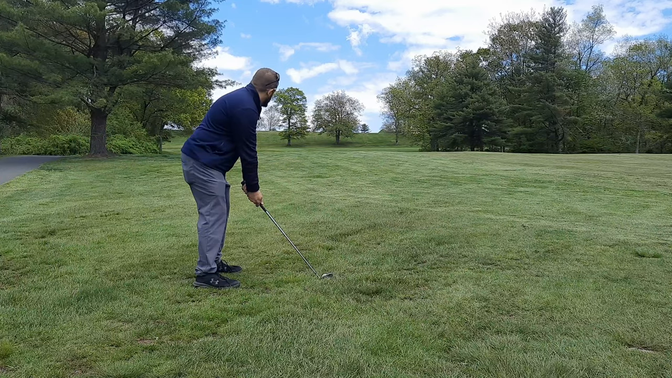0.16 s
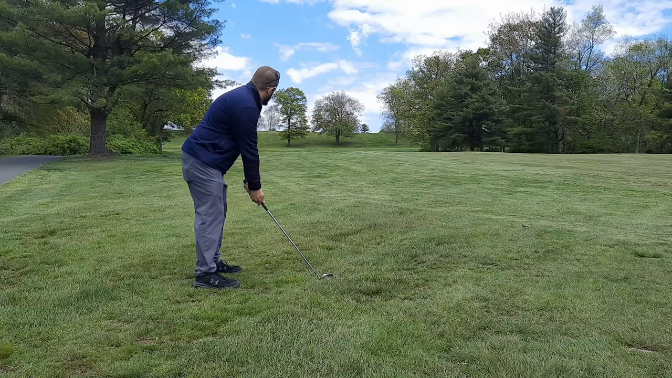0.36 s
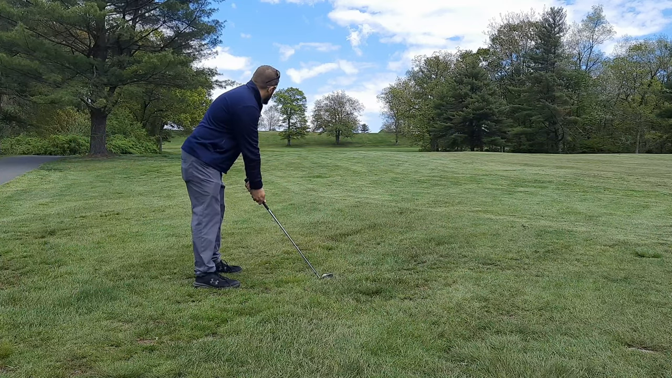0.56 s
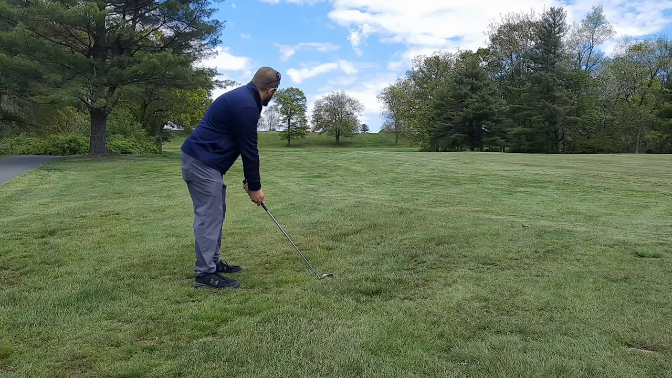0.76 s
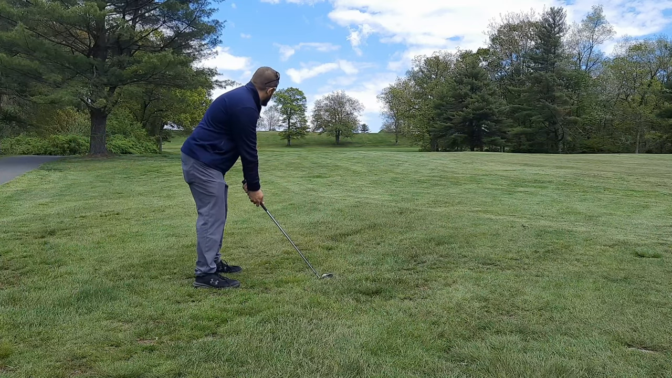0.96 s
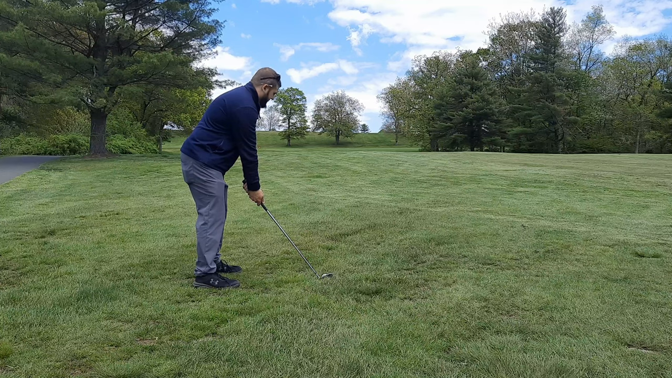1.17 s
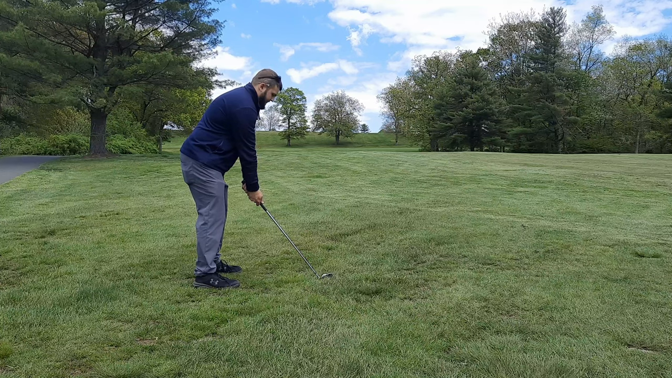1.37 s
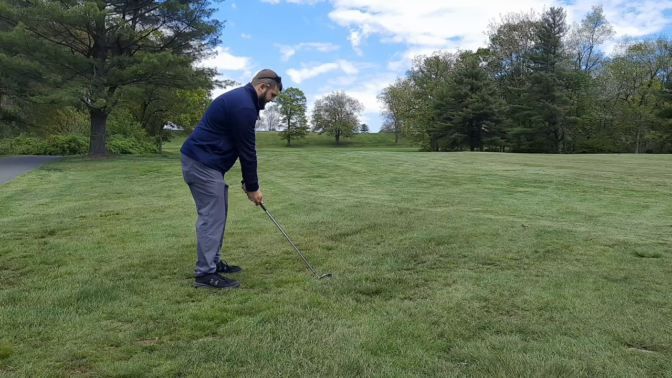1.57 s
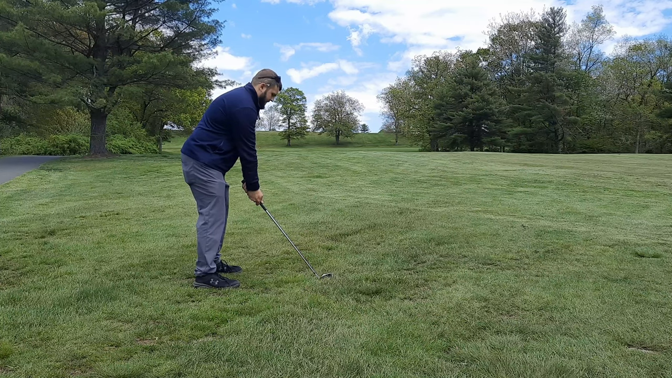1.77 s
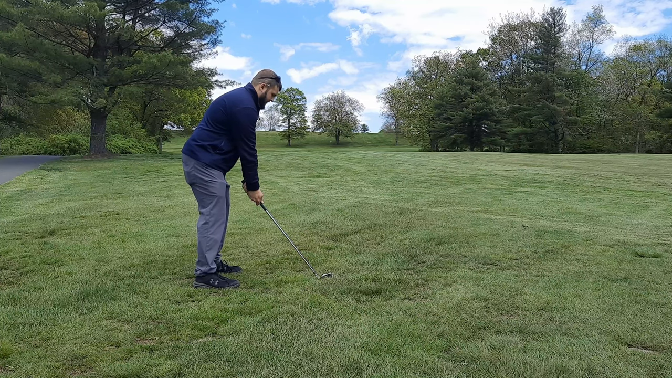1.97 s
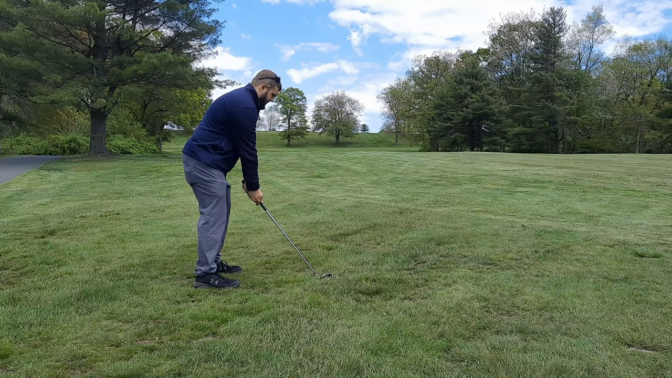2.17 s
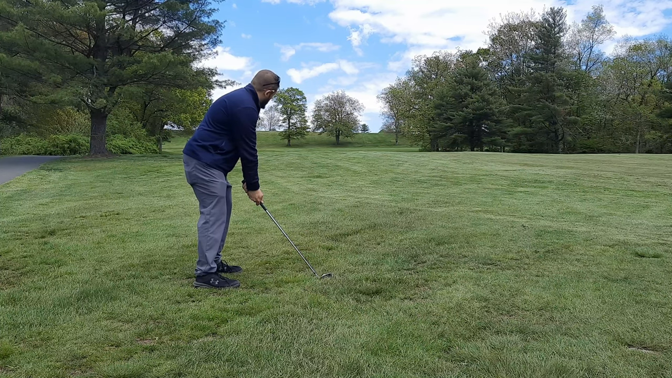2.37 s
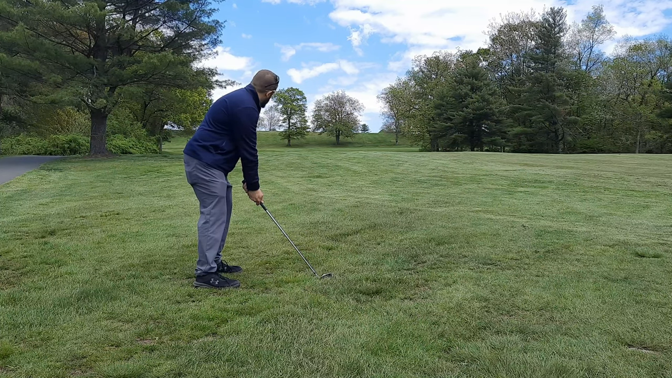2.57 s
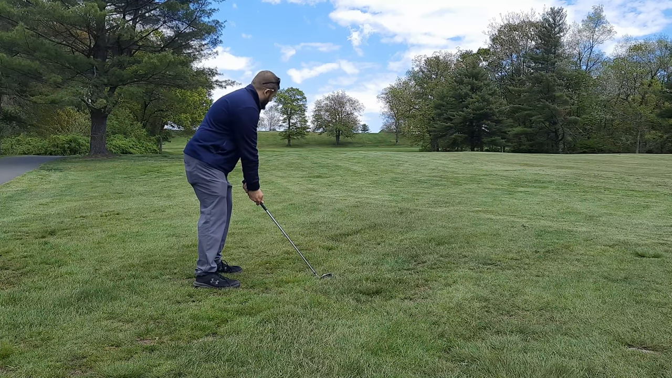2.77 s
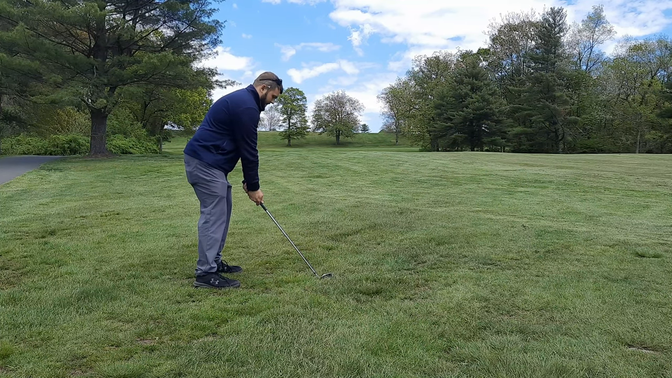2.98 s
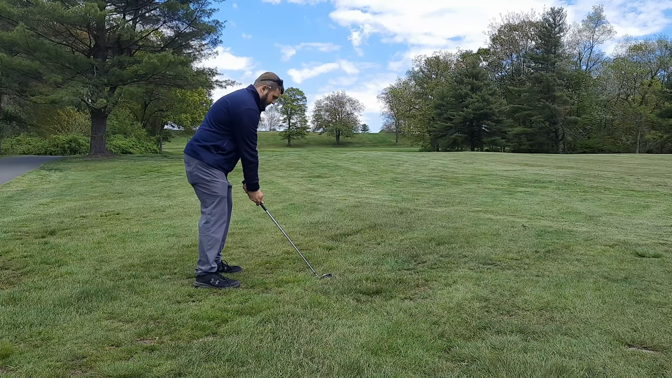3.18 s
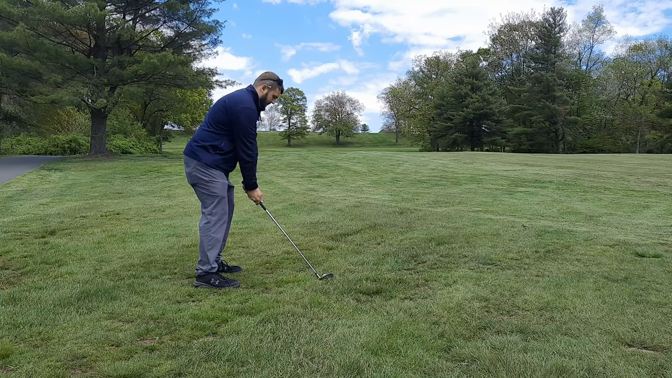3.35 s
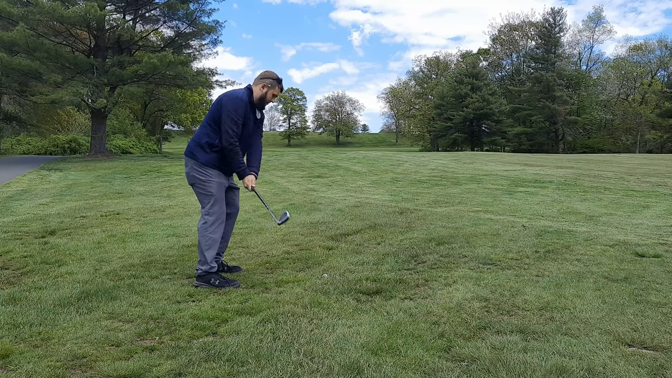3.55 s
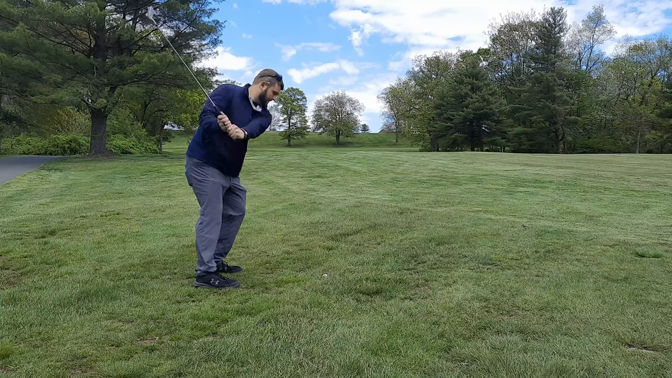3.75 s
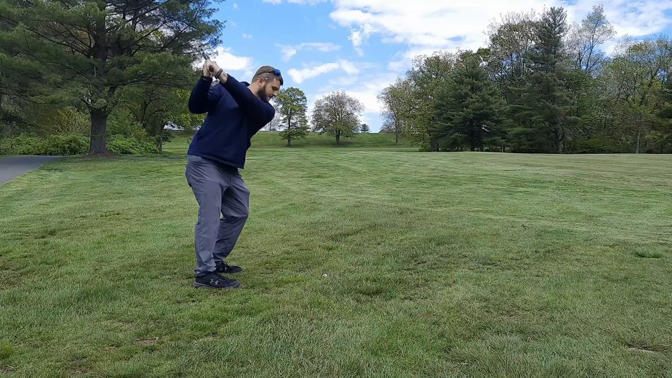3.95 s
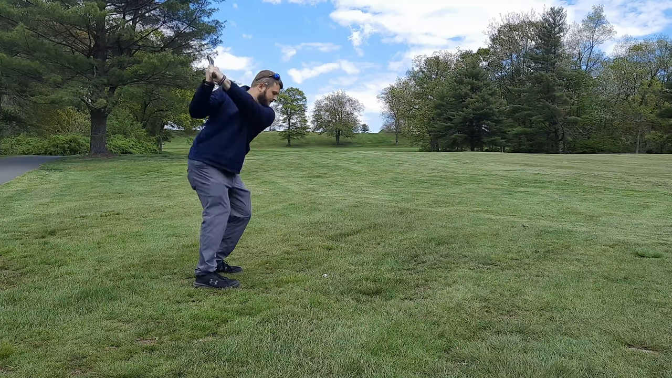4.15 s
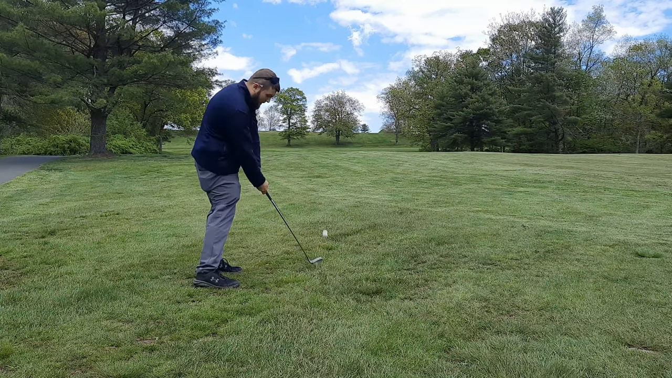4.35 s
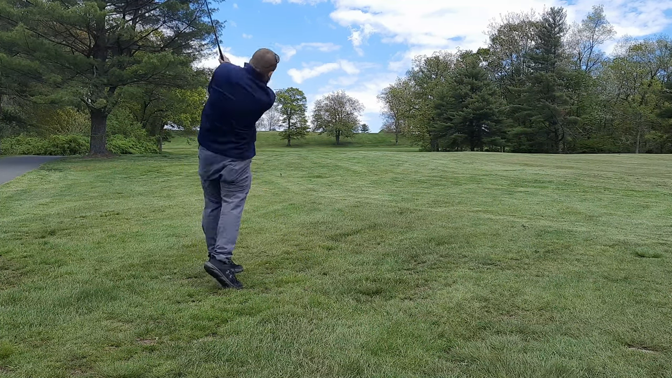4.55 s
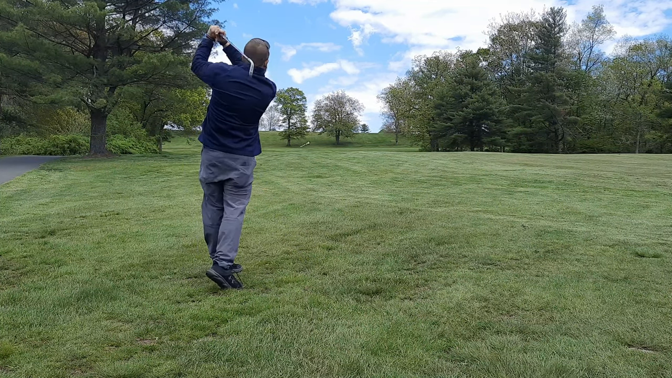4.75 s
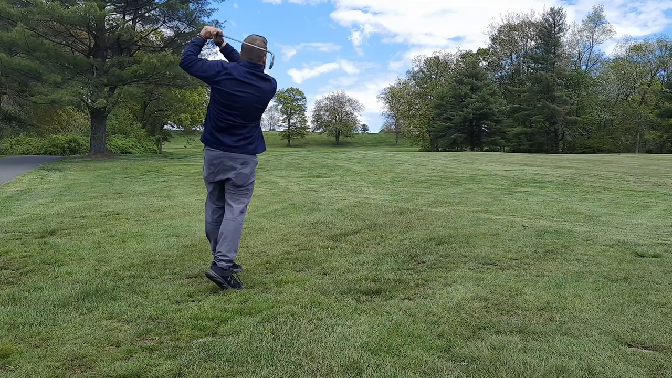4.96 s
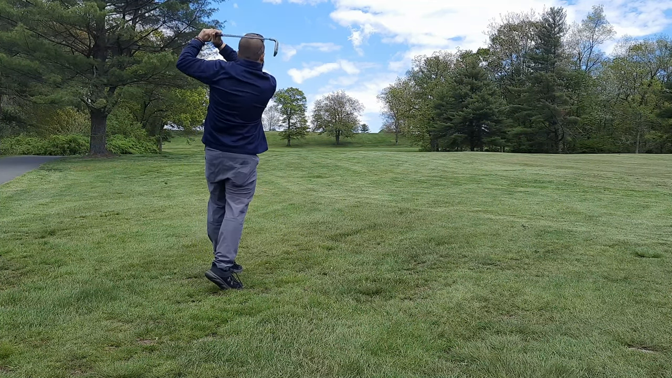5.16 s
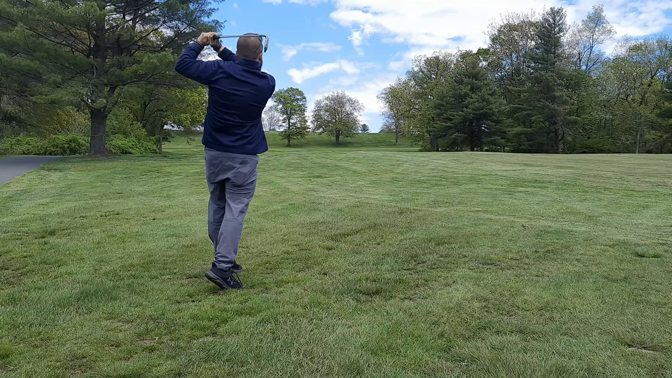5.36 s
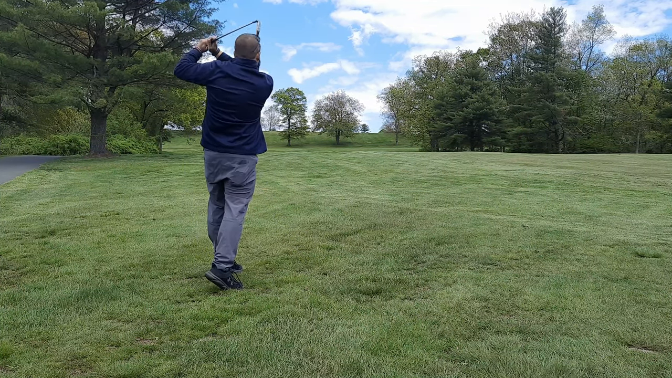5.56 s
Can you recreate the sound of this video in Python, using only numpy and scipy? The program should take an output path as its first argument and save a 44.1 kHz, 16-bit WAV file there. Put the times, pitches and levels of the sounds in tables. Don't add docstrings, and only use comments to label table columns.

```python
import sys
import numpy as np
from scipy import signal
from scipy.fft import rfft, irfft
from scipy.io import wavfile
from scipy.ndimage import uniform_filter1d, map_coordinates

SR = 44100
rng = np.random.default_rng(int(sys.argv[2]) if len(sys.argv) > 2 else 0)


def voltage_ratio(level):
    return 10 ** (np.asarray(level, float) / 20)


def store_wav(level_fs):
    pcm = np.round(np.clip(np.atleast_2d(level_fs), -1, 1) * 32767)
    wavfile.write(sys.argv[1], SR, pcm.T.astype(np.int16))


N = 247785
T = np.arange(N) / SR

# (frequency [Hz], level per Hz [dB])
RUMBLE_SPECTRUM = [(25, -30), (50, -8.5), (70, -6.5), (144, -7), (194, -15.5), (330, -12.5), (379, -20.5),
                   (458, -25), (750, -31), (1140, -43), (2200, -50), (4200, -58.5), (9000, -66),
                   (13000, -60.5)]
# (frequency [Hz], likeness [0 to 1])
STEREO_LIKENESS = [(80, 0.91), (250, 0.94), (450, 1), (650, 0.53), (860, 0.23), (1300, 0.36), (2200, 0.15),
                   (3500, .15), (6000, 0.04)]
RUMBLE_DB = -47.5
MOWER_LAG = 24

# (frequency [Hz], width [Hz], level [dB])
FAR_MOWER = [(61.3, 1.2, -62.5), (122.5, 4, -56), (134, 6.5, -57.5), (181, 2, -76), (255, 14, -62.5),
             (300, 8, -57.5), (374, 5, -68), (2130, 520, -87)]
# (time [s], level [dB])
FIRING_LEVEL = [
    [(0, -43), (.18, -49.5), (.27, -54), (.38, -46), (1.2, -47.5), (1.8, -50), (2.2, -51), (2.6, -44.5),
     (4.2, -43), (4.35, -48.5), (4.8, -48.5), (4.95, -54), (5.2, -52.5), (5.37, -61.5), (5.6, -41.5)],
]
# (multiple of firing rate, level [dB])
UPPER_ORDERS = [(3, -1), (4, -3), (5, -15.5), (8, -21)]
# (start [s], length [s], level [dB])
SECOND_SWELLS = [
    (0, 0.37, -55),
    (.3, 0.41, -54),
    (.95, 0.82, -54.5),
    (1.9, 1.32, -50.5),
    (2.95, 1.18, -54),
    (4.25, 1.38, -49.5),
]
# (start [s], length [s], level [dB])
BELT_WHINE = [
    (0, .12, -92),
    (.5, 0.24, -93),
    (1.3, 0.43, -95),
    (2.85, .13, -83.5),
    (3.04, 0.55, -84.5),
    (3.75, 0.48, -93),
    (4.8, .4, -94.5),
    (5.3, .25, -96),
]
FIRING_HZ, BLADE_HZ, WHINE_HZ = 77.73, 327, 2150
SECOND_REST_DB, SECOND_EDGE_S = -67.5, 0.29
WHINE_REST_DB, WHINE_EDGE_S = -101, 0.07
UPPER_DB, BLADE_DB = -58, -56.5
RECEDE_S, RECEDE_DB_PER_S = 2.4, 1.5

# (start [s], length [s], level [dB])
WHISTLES = [
    (4.752, .21, -76),
    (5.172, .25, -76),
]
WHISTLE_HZ, WHISTLE_SAG_HZ, SAG_S = 4655, 170, .03
WHISTLE_ATTACK_S, WHISTLE_HOLD_S, WHISTLE_FADE_DB_PER_S = .015, .06, 110
# (start [s], length [s], level [dB])
RISES = [
    (.30, .027, -85),
    (1.453, .02, -79),
    (1.543, .01, -80),
    (4.945, .02, -86),
    (5.15, .014, -87),
]
RISE_FROM_HZ, RISE_HZ_PER_S = 5200, 52000
FALLS_S, FALL_EVERY_S, FALL_LENGTH_S = 5.28, .104, .045
FALL_FROM_HZ, FALL_TO_HZ, FALL_DB = 7300, 5050, -87.5
# (start [s], length [s], start frequency [Hz], end frequency [Hz], level [dB])
NOTES = [
    (.228, .012, 4700, 4850, -90),
    (2.82, .07, 4800, 5250, -92),
    (4.37, .07, 4700, 4550, -93),
    (4.99, .045, 6050, 6050, -89),
    (5.13, .03, 6850, 7050, -84),
    (5.18, .05, 6150, 6100, -88),
    (5.575, .02, 6200, 8000, -90),
]

# (peak time [s], level [dB], low edge [Hz], high edge [Hz], rise and t60 [s])
WASHES = [
    (3.25, -80, 1950, 2350, 1.5),
    (3.9, -80, 2300, 4200, 2.5),
    (4.74, -70, 2000, 15500, .45),
    (4.0, -86, 4200, 15500, 4.0),
    (5.13, -69, 700, 1300, .15),
    (5.25, -65, 550, 1200, .7),
    (5.4, -70, 500, 1000, .7),
    (5.42, -85, 4000, 7000, 1.2),
    (4.82, -82, 4200, 5300, .8),
    (5.24, -81, 4200, 5600, .7),
]

# (peak time [s], level [dB], low edge [Hz], high edge [Hz], t60 [s])
BRUSH = [
    (3.525, -67.5, 5500, 15700, 0.33),
    (3.54, -77.5, 1420, 1535, .3),
    (3.6, -81, 2670, 2780, 0.44),
    (3.62, -83.5, 3500, 3730, 0.48),
]
SWISH = [
    (4.47, -44.5, 600, 2300, .3),
    (4.468, -57, 2300, 8000, .55),
    (4.455, -69, 8000, 15500, 1.0),
]
CRACK = [
    (4.4955, -29, 1200, 15500, .05),
    (4.502, -17, 3300, 8500, .035),
    (4.5015, -24.5, 10500, 15500, .04),
]
TURF = [
    (4.506, -29, 324, 950, 0.063),
    (4.5125, -22.5, 2500, 15500, 0.0039),
    (4.519, -39.5, 1525, 4480, .04),
    (4.524, -62, 4500, 15500, .04),
    (4.529, -38.5, 1518, 3003, .012),
]
SPRAY = [
    (4.545, -63.5, 599, 2800, 1),
    (4.55, -66, 3000, 15500, 0.97),
    (4.653, -64, 702, 6018, 0.29),
    (4.692, -64.5, 9300, 15710, .08),
    (4.733, -56, 825, 2400, 0.15),
]
CRUMBS = [
    (4.633, -55.5, 4100, 15600, 0.19),
    (4.636, -61, 14000, 15390, 0.13),
    (4.665, -57.5, 800, 2500, 0.09),
    (4.778, -66, 7990, 15500, .06),
    (5.17, -73, 6000, 15500, 0.13),
]
BRUSH_RISE_S, SWISH_RISE_S, CRACK_RISE_S = .3, .1, .014
TURF_RISE_S, SPRAY_RISE_S, CRUMB_RISE_S = .05, .09, .01

# (time [s], signed strength [full scale], ring [Hz], t60 [s], left over right [dB])
CONTACTS = [(4.4975, -.1, 580, .025, 1), (4.4995, -.12, 600, .012, 1), (4.5013, -.26, 700, .014, 1),
            (4.50125, .8, 2000, .003, .5), (4.5032, .4, 2085, .012, .5), (4.5014, .2, 6000, .004, -3),
            (4.5033, .1, 3250, .015, 0), (4.5021, .11, 1100, .02, 1.5), (4.5050, .08, 330, .05, 0),
            (4.5000, .04, 125, .1, 1), (4.5102, .06, 7200, .008, 6), (4.5040, .07, 1370, .022, 1),
            (4.5030, .07, 2780, .02, 1), (4.5110, .12, 2550, .012, 3), (4.5130, -.04, 200, .05, 0),
            (4.462, .006, 650, .08, 0), (4.7258, .012, 1320, .008, 1.5), (4.7352, .008, 2050, .012, 1.5)]
PORT_NOTCH_HZ = 9430


def rms_one(x):
    return x / np.sqrt(np.mean(x ** 2) + 1e-20)


def in_time(spans):
    s, *columns = np.transpose(np.concatenate(spans))
    return [np.interp(T, s, c) for c in columns]


def at_hz(points, hz):
    point_hz, values = np.transpose(points)
    return np.interp(np.log(hz), np.log(point_hz), values)


def drift(rate):
    knots = rng.standard_normal(500)
    return map_coordinates(knots, [T * rate + 3], order=3)


def tone(hz):
    return np.sin(2 * np.pi * np.cumsum(hz) / SR)


def swells(rows, rest_db, edge):
    gain = voltage_ratio(rest_db)
    for s, length, db in rows:
        gain = gain + voltage_ratio(db) * np.clip(np.minimum(T - s, s + length - T) / edge, 0, 1)
    return gain


def placed(x, lag, pan_db):
    late = np.interp(np.arange(N) - lag, np.arange(N), x)
    return np.array([x * voltage_ratio(pan_db / 2), late * voltage_ratio(-pan_db / 2)])


def bursts(rows, rise_s=None):
    out = np.zeros((2, N))
    for s, db, low_hz, high_hz, t60 in rows:
        a, b = int((s - .6) * SR), min(int((s + 1) * SR), N)
        draw = rng.standard_normal((4, b - a))
        grain = voltage_ratio(3.2 * rms_one(uniform_filter1d(draw[3], size=40)))
        alike = np.clip(2000 / np.sqrt(low_hz * high_hz), 0, 1) ** 2 * 0.95
        pair = np.sqrt(alike) * draw[0] + np.sqrt(1 - alike) * draw[1:3]
        band = signal.butter(4, [low_hz, min(high_hz, 20000)], "band", fs=SR, output="sos")
        noise = rms_one(signal.sosfilt(band, pair * grain))
        t = T[a:b] - s
        shape_db = np.where(t < 0, 60 * t / (rise_s or t60), -60 * t / t60)
        out[:, a:b] += noise * voltage_ratio(db + np.maximum(shape_db, -200))
    return out * voltage_ratio(np.array([[.6], [-.6]]))


def rumble():
    hz = np.fft.rfftfreq(N, 1 / SR) + .01
    shared, left, right = rfft(rng.standard_normal((3, N)))
    alike = np.clip(at_hz(STEREO_LIKENESS, hz), 0, 1)
    late = np.exp(-2j * np.pi * hz * MOWER_LAG / SR)
    common = np.sqrt(alike) * shared * [np.ones_like(late), late]
    pair = common + np.sqrt(1 - alike) * np.array([left, right])
    noise = rms_one(irfft(pair * voltage_ratio(at_hz(RUMBLE_SPECTRUM, hz)), N))
    return noise * voltage_ratio(RUMBLE_DB + .7 * drift(2)) * voltage_ratio(np.array([[.4], [-.4]]))


def far_mower():
    hz = np.fft.rfftfreq(N, 1 / SR)
    peaks = np.zeros(len(hz))
    for f, width, db in FAR_MOWER:
        peaks += voltage_ratio(db) / np.sqrt(width) / (1 + (2 * (hz - f) / width) ** 2)
    return irfft(rfft(rng.standard_normal(N)) * peaks, N) * np.sqrt(SR / 2)


def near_mower():
    firing_db, = in_time(FIRING_LEVEL)
    recede_db = -RECEDE_DB_PER_S * np.maximum(T - RECEDE_S, 0)
    turn = 2 * np.pi * np.cumsum(FIRING_HZ + .12 * drift(2)) / SR
    out = voltage_ratio(firing_db + 5.0 + 1.0 * drift(4.9)) * np.cos(turn)
    second = swells(SECOND_SWELLS, SECOND_REST_DB, SECOND_EDGE_S) * voltage_ratio(5 + 0.7 * drift(4.2))
    out += second * np.sin(2 * turn + rng.uniform(0, 6))
    for multiple, db in UPPER_ORDERS:
        level = voltage_ratio(UPPER_DB + recede_db + db + 6.0 + 1.5 * drift(4.4))
        out += level * np.sin(multiple * turn + rng.uniform(0, 6.7))
    out += voltage_ratio(BLADE_DB + recede_db + 8.5 + 1.0 * drift(6)) * tone(BLADE_HZ + .5 * drift(3.8))
    whine = swells(BELT_WHINE, WHINE_REST_DB, WHINE_EDGE_S) * voltage_ratio(6.5 + 2.0 * drift(50))
    return out + whine * tone(WHINE_HZ + 14 * drift(60))


def whistles():
    out = np.zeros(N)
    for s, length, db in WHISTLES:
        t = np.clip(T - s, 0, length)
        edge = np.clip(np.minimum(t, length - t) / WHISTLE_ATTACK_S, 0, 1)
        fade_db = WHISTLE_FADE_DB_PER_S * np.maximum(t - WHISTLE_HOLD_S, 0)
        level = edge * voltage_ratio(db + 10 - fade_db + 2.0 * drift(80))
        hz = WHISTLE_HZ + WHISTLE_SAG_HZ * np.exp(-t / SAG_S)
        out += level * tone(hz + 14 * drift(60))
    return out


def chirps():
    rises = [(s, length, RISE_FROM_HZ, RISE_FROM_HZ + RISE_HZ_PER_S * length, db) for s, length, db in RISES]
    falls = [(FALLS_S + k * FALL_EVERY_S, FALL_LENGTH_S, FALL_FROM_HZ, FALL_TO_HZ, FALL_DB) for k in range(3)]
    out = np.zeros(N)
    for s, length, start_hz, end_hz, db in rises + falls + NOTES:
        u = np.clip((T - s) / length, 0, 1)
        level = np.sin(np.pi * u) ** .5 * voltage_ratio(db + 4 + 1.0 * drift(60))
        out += level * tone(start_hz + (end_hz - start_hz) * u)
    return out


def birds():
    long, quick = whistles(), chirps()
    leaves = rng.standard_normal((2, 6000)) * voltage_ratio(-60 * T[:6000] / .2 - 44)
    smear = signal.fftconvolve((.15 * long + 2.2 * quick)[None], leaves, axes=1)[:, :N]
    return placed(long, 4, 5.5) + placed(quick, 2, 3) + smear


def slow_washes():
    return bursts(WASHES)


def falling_soil():
    return bursts(SPRAY, SPRAY_RISE_S) + bursts(CRUMBS, CRUMB_RISE_S)


def swing():
    return bursts(BRUSH, BRUSH_RISE_S) + bursts(SWISH, SWISH_RISE_S)


def crack_and_tear():
    return bursts(CRACK, CRACK_RISE_S) + bursts(TURF, TURF_RISE_S)


def strike():
    out = np.zeros((2, N))
    for s, strength, ring_hz, t60, pan_db in CONTACTS:
        t = np.maximum(T - s, 0)
        decay = voltage_ratio(np.maximum(-60 * t / t60, -200))
        out += placed(strength * decay * np.sin(2 * np.pi * ring_hz * t), 1.5, pan_db)
    return out


def scene():
    distant = rumble() + placed(far_mower() + near_mower(), MOWER_LAG, .8) + birds()
    near = slow_washes() + falling_soil() + swing() + crack_and_tear() + strike()
    b, a = signal.iirnotch(PORT_NOTCH_HZ, 3.5, SR)
    return distant + .3 * near + .7 * signal.lfilter(b, a, near)


def low_pass(x):
    return signal.sosfilt(signal.butter(12, 15760, fs=SR, output="sos"), x)


def record(dry):
    rolled = signal.sosfilt(signal.butter(2, 48, "high", fs=SR, output="sos"), dry)
    rolled = signal.sosfilt(signal.ellip(10, .5, 70, 15500, fs=SR, output="sos"), rolled)
    return low_pass(rolled)


dry = scene()
out = record(dry)
store_wav(out)
```